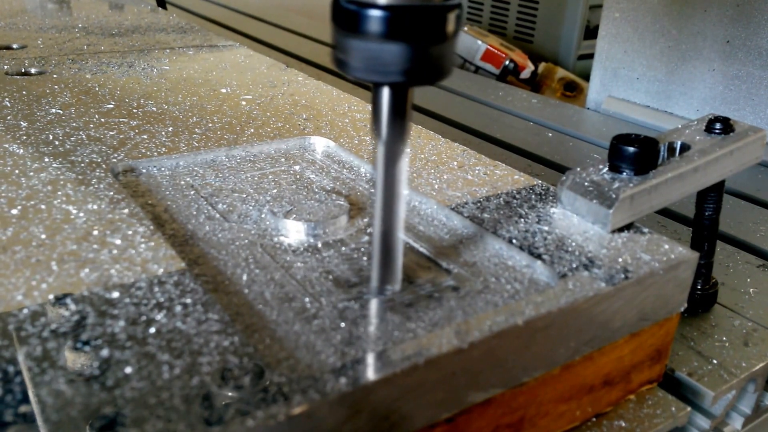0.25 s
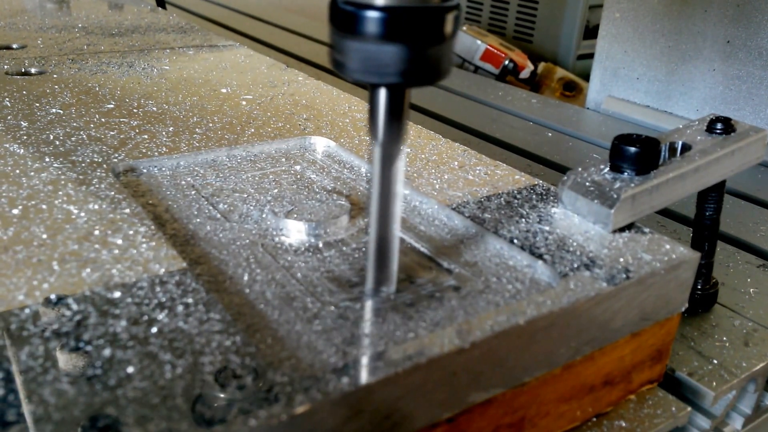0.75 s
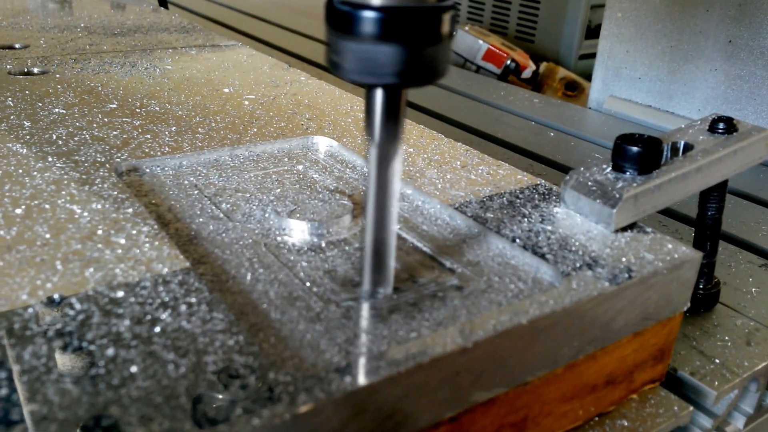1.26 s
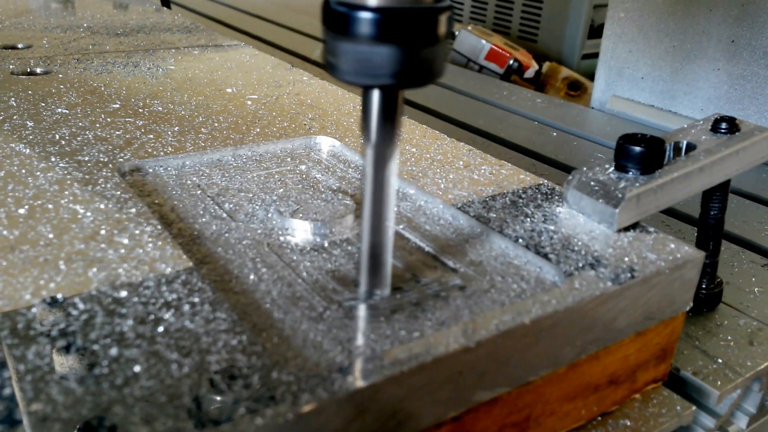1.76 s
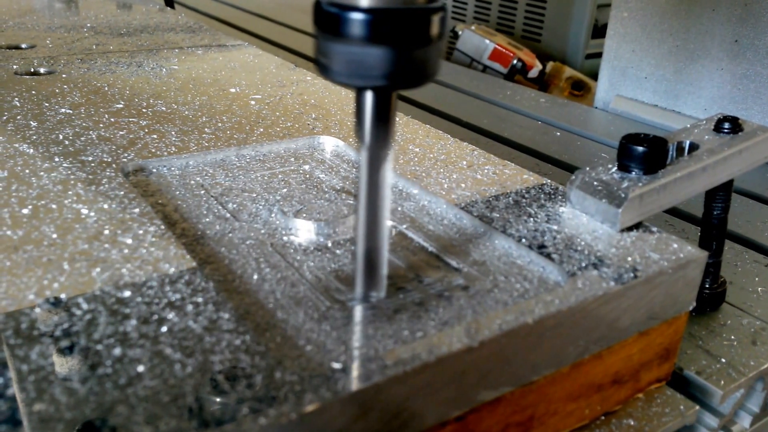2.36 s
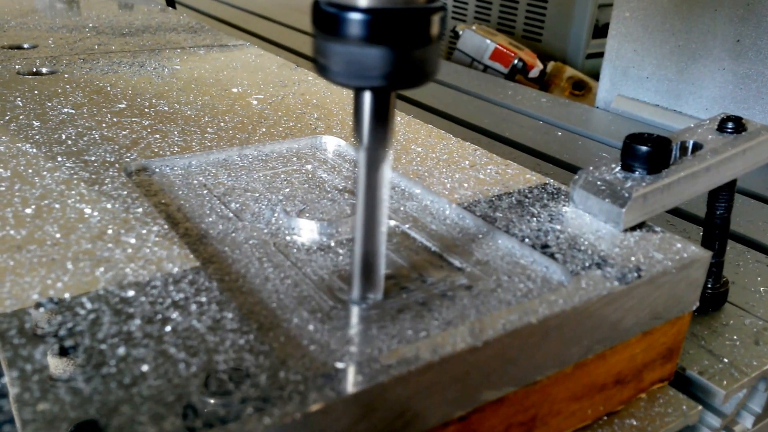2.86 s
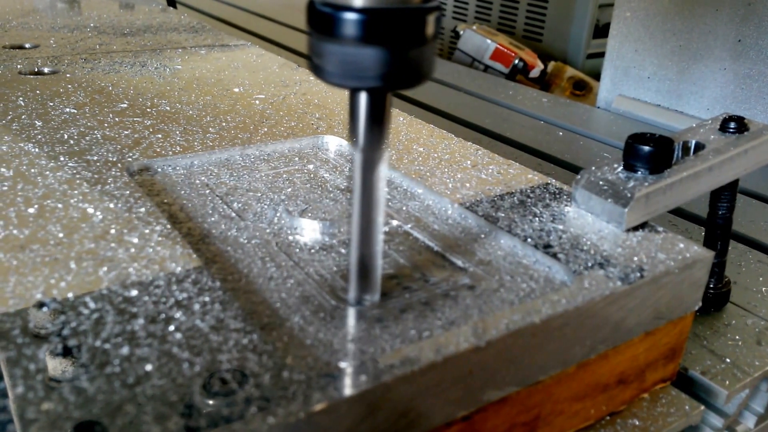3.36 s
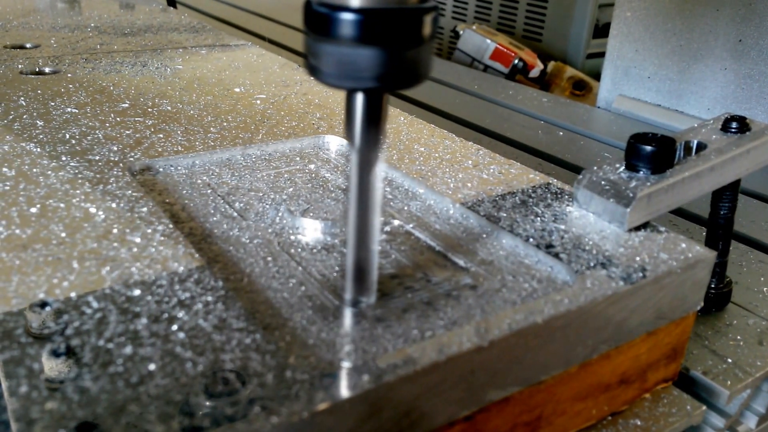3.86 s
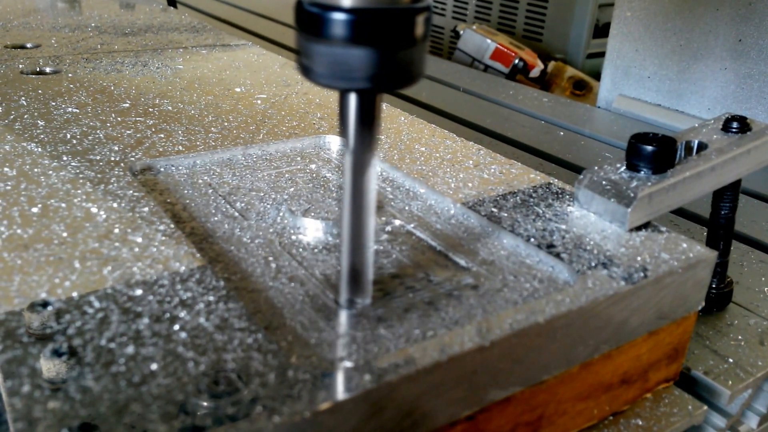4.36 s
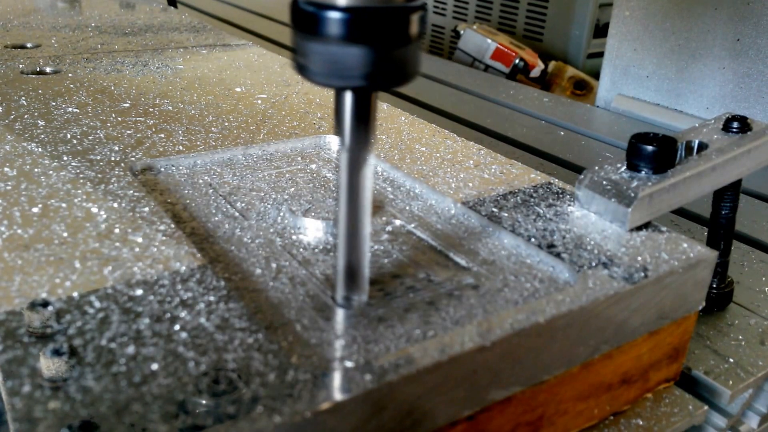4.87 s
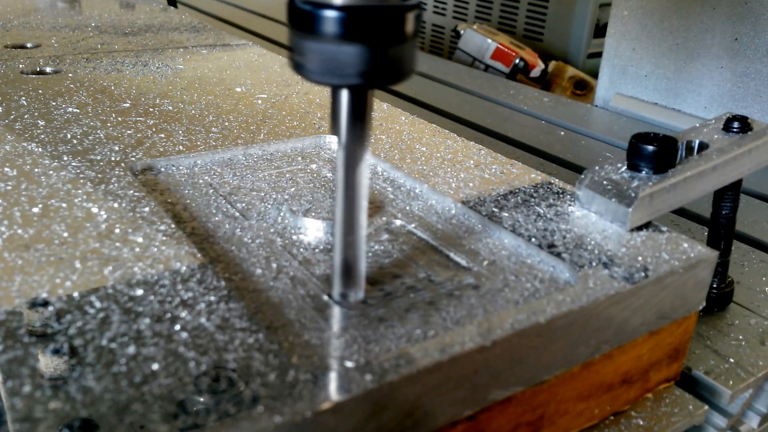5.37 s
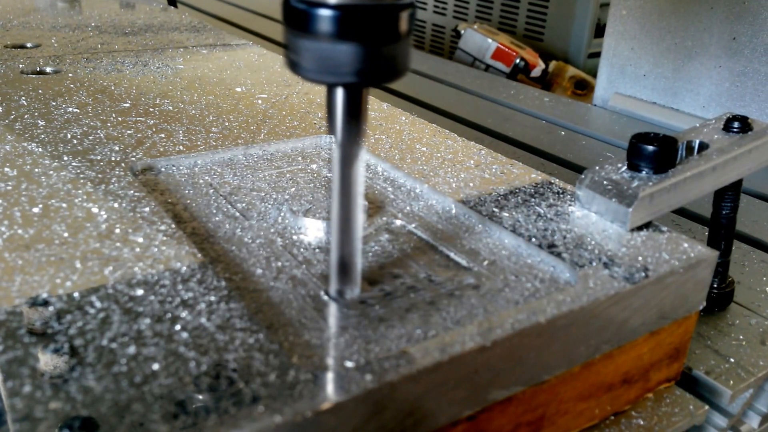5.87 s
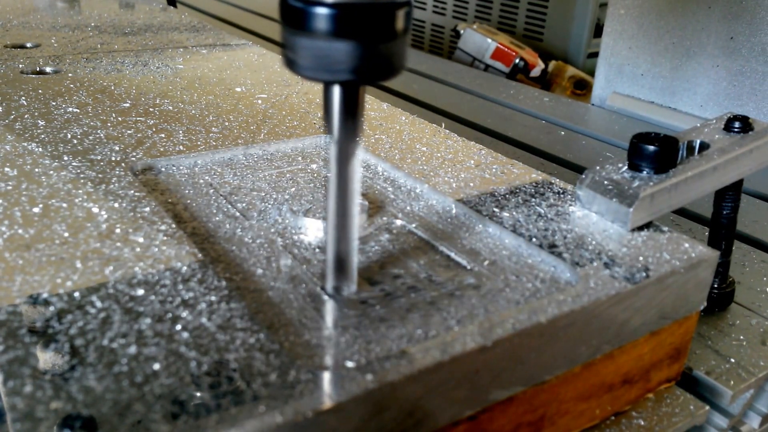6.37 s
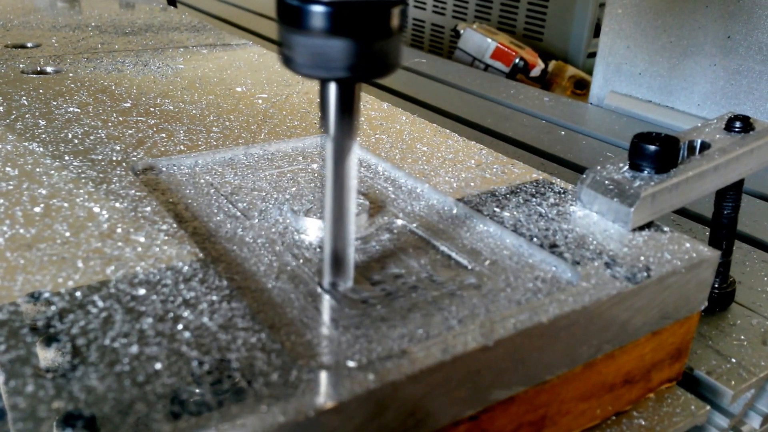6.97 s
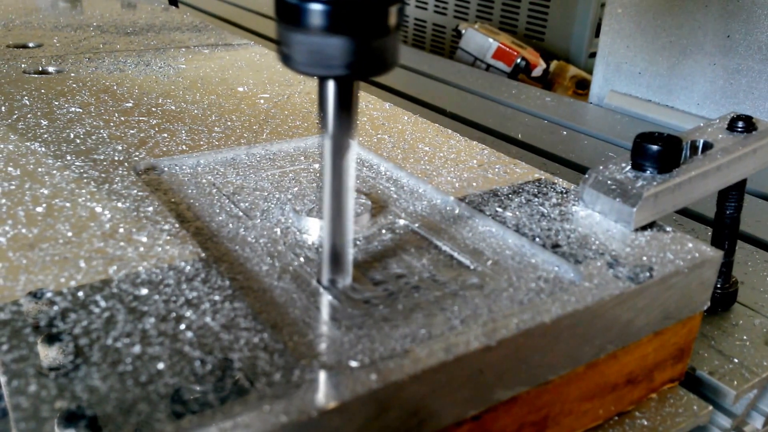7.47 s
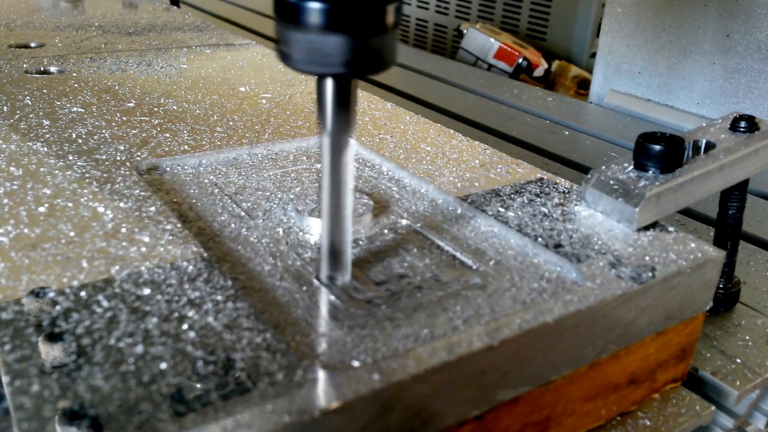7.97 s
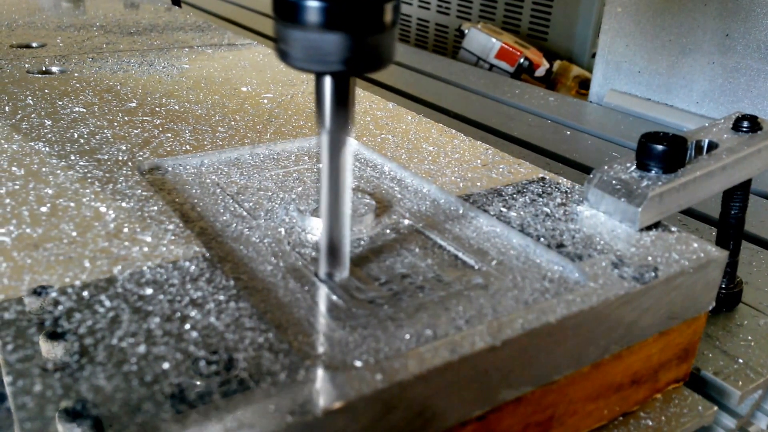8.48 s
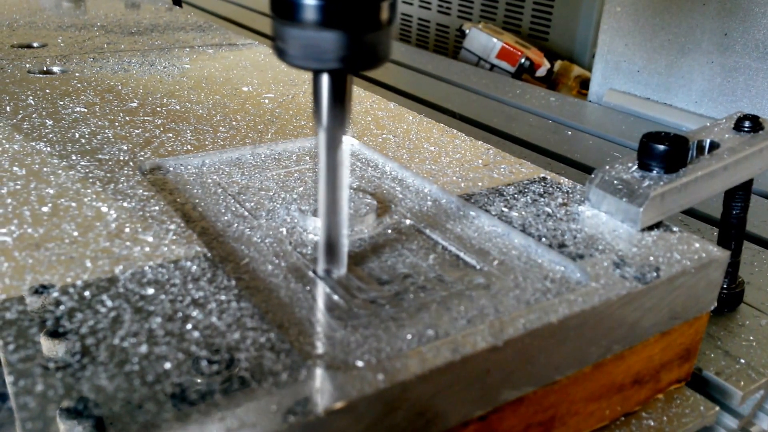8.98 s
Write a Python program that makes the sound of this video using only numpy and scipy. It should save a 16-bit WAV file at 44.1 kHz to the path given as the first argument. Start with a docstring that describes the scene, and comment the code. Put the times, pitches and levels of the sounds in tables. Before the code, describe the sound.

In a workshop, a high-speed router mills a metal plate close to the microphone. A dense, bright whine over a mid-low hum wavers slowly, with hissing chips and metallic ringing. Ragged high chatter comes in bouts, tightens into a clear squeal near four seconds, and stops abruptly at the corner. Smoother whining and hissing continue to the end. The right side is bright, the left dull.

```python
"""In a workshop, a CNC router mills a pocket in an aluminium plate with a two-flute cutter at about 24000 rpm.
The induction rotor slips behind its drive, so paired sines make each order of the whine beat; fixed sines
give the hum of the machine, its bearings and the whistle of the inverter. Gliding sines with sidebands chatter,
then lock into a squeal that ends at the corner of the pocket. Shaped noise gives hissing chips, a ringing plate
and rumble; short enveloped sines knock in the frame. The left microphone port is muffled."""
import sys
import numpy as np
from scipy import signal
from scipy.fft import rfft, irfft
from scipy.io import wavfile

SR = 44100
rng = np.random.default_rng(int(sys.argv[2]) if len(sys.argv) > 2 else 0)


def output_pcm(signal):
    """Save a mono or channel-first signal as 16-bit PCM at the path in sys.argv[1].

    Samples are clipped to [-1, 1] before scaling.
    """
    pcm = np.clip(np.atleast_2d(signal).T, -1, 1) * 32767
    wavfile.write(sys.argv[1], SR, np.round(pcm).astype(np.int16))


N = 407484
TIME = np.arange(N) / SR
FREQS = np.fft.rfftfreq(N, 1 / SR)

DRIVE_HZ = 399.905  # turns per second of the drive field
IN_STEP_S = 7.64  # rotor and drive line up at this moment
CUTTER_HZ = 4500  # the cutter's own mode
SQUEAL_S = 3.97  # the chatter locks here and holds until the corner
CORNER_S = 4.535  # the cutter turns onto the second side
CHATTER_EDGE_S = 0.047  # length of the ramp at either end of a bout of chatter

# how hard the cutter is loaded, before each layer takes its share: (time [s], load [dB])
DEPTH = [(0, 2.6), (1.2, 0), (3.4, -0.4), (4.6, -1.6), (5.3, -0.8), (6.1, 1), (9.24, 1.5)]


def undb(db):
    """Decibels to gain."""
    return 10 ** (np.asarray(db) / 20)


def curves(table):
    """Each column of a table of moments, joined by straight lines."""
    s, *columns = np.transpose(table)
    return [np.interp(TIME, s, column) for column in columns]


def spectra(table):
    """Each column of a table of frequencies, joined on a log axis."""
    hz, *columns = np.transpose(table)
    return [np.interp(np.log(FREQS + 1), np.log(hz), column) for column in columns]


def walk(rate):
    """Random control curve with a spread near 1 and this many new values a second."""
    knots = rng.standard_normal(8192)
    return 1.2 * np.interp(TIME * rate, np.arange(len(knots)), knots)


def noise(gain):
    """Noise with the given amplitude per root Hz."""
    return irfft(rfft(rng.standard_normal(N)) * gain, N) * np.sqrt(SR / 2)


def tone(cycles, db):
    """A sine of the given rms level."""
    return np.sqrt(2) * undb(db) * np.sin(2 * np.pi * cycles)


def step(s, length_s):
    """A ramp from 0 to 1 centred on a moment."""
    return np.clip((TIME - s) / length_s + .5, 0, 1)


def squeal_grip():
    """How far the squeal has taken over from clean cutting, 0-1: it builds, then lets go at the corner."""
    build_s, release_s = 0.49, 0.025
    return np.clip((TIME - SQUEAL_S) / build_s, 0, 1) * (1 - step(CORNER_S, release_s))


def rotor_lag():
    """Turns by which the rotor has fallen behind its drive; every beat in the whine follows this."""
    first_hz, second_hz, squeal_extra_hz = .39, .407, .16
    first_side_hz = first_hz + squeal_extra_hz * (TIME > SQUEAL_S)
    slip_hz = np.where(TIME < CORNER_S, first_side_hz, second_hz)
    lag = np.cumsum(slip_hz) / SR
    return lag - np.interp(IN_STEP_S, TIME, lag)


def low_tones(turns, lag):
    """The once-a-turn hum, and the flute tone, which swells twice for each turn that the rotor loses."""
    # once-a-turn hum before its gain and flicker: (time [s], level [dB])
    hum_levels = [(0.0, -34), (0.67, -47), (1.44, -36), (2.57, -44.5), (3.29, -43.5), (3.94, -39),
                  (4.42, -51), (4.58, -44.5), (5.51, -48), (6.25, -42.5), (8.05, -43), (8.26, -40),
                  (9.24, -42.5)]
    # flute tone under its beat and flicker: (time [s], level [dB])
    flute_levels = [(0, -23), (1.4, -29), (2.7, -26.5), (3.4, -28.5), (5.3, -28), (9.24, -25)]
    hum_gain_db, hum_flicker_db = 4, 1.06
    beat_db, beat_lead_turns, flute_flicker_db = 3, 0.057, 0.95
    hum_db = curves(hum_levels)[0] + hum_gain_db + hum_flicker_db * walk(20)
    beat = beat_db * np.cos(4 * np.pi * (lag + beat_lead_turns))
    flute_db = curves(flute_levels)[0] + beat + flute_flicker_db * walk(30)
    return tone(turns, hum_db) + tone(2 * turns, flute_db)


def spindle(turns):
    """Orders of the rotor, each beating against the same order of the drive."""
    # one row per order of the turn, from the third up; levels before load, squeal, flicker and swells:
    # (level on the first side [dB], level on the second side [dB], drive over rotor [dB])
    order_levels = [(-39.5, -49, -26), (-33.5, -43.5, -33), (-60.5, -44.5, -30), (-45, -42.5, -21),
                    (-49.5, -49, -10), (-35.5, -33.5, -32), (-49, -56, -6), (-32, -34.5, -10.5),
                    (-30, -28, 5.5), (-34.5, -32.5, -9.5), (-30, -28, 2.5), (-33, -36.5, -5),
                    (-42.5, -48, 1), (-40, -37.5, 7), (-35.5, -37, 10.5), (-40.5, -34.5, -18),
                    (-28, -32, -7.5), (-29.5, -29.5, 4.5), (-33, -26, 9), (-26, -26.5, -8), (-32, -28.5, 6),
                    (-28.5, -31, 2), (-39, -30, 5), (-36, -44, -8), (-33, -31.5, 16), (-36, -35, -2),
                    (-40, -45, -1), (-31.5, -33, -10), (-36, -34, 19), (-40, -43, -1), (-35, -43, 16),
                    (-44, -45, -7), (-44, -44, 12), (-43, -39.5, -5)]
    # single orders swell or fade as the cutter travels over the plate:
    # (order [-], centre time [s], time from the centre to 1/e of the change [s], change [dB])
    swells = [(3, 0.12, 0.5, 3.5), (3, 8.46, 1, 6), (7, 1.31, 0.22, 11), (8, 1.32, .22, -11),
              (10, 1.43, 0.23, 8.5), (11, 1.32, 0.12, 8.5), (18, 1.35, 0.23, 7), (8, 3.98, 0.13, 7.5),
              (8, 4.17, 0.1, -7)]
    depth_share, squeal_db = 0.58, -7
    flicker_db, sway_db = 1.54, 1.13  # fast and slow level changes
    twist_turns = 0.0016
    skew_turns = 0.0897  # each higher order beats a little later
    nearest_order = round(CUTTER_HZ / DRIVE_HZ)
    drive = DRIVE_HZ * (TIME - IN_STEP_S)
    strength_db = depth_share * curves(DEPTH)[0] + squeal_db * squeal_grip()
    shaken = turns + twist_turns * walk(120)  # each bite twists the cutter a little
    whine = 0
    for order, (first_db, second_db, drive_db) in enumerate(order_levels, start=3):
        # low orders come from the gantry and change with its position; high ones change with the cut
        blend_s = 1.42 if order < 8 else .02
        db = first_db + step(CORNER_S, blend_s) * (second_db - first_db) + strength_db
        db = db + flicker_db * walk(35) + sway_db * walk(1.995)
        for swell_order, s, spread_s, swell_db in swells:
            if round(swell_order) == order:
                db = db + swell_db * np.exp(-((TIME - s) / spread_s) ** 2)
        # short waves travel by different paths, so the high orders beat out of step
        start = rng.random()
        path = rng.standard_normal() * np.clip((order - 13) / 20, 0, 1)
        path = path - skew_turns * (order - nearest_order)
        rotor_tone = tone(order * shaken + start, 0)
        drive_tone = tone(order * drive + start + path, drive_db)
        # the level is that of both tones together
        whine = whine + undb(db) * (rotor_tone + drive_tone) / np.hypot(1, undb(drive_db))
    return whine


def steady_tones():
    """Machine hum, bearing tones and the switching whistle of the inverter: fixed sines that flicker."""
    # pitches of machine, bearings and inverter: (frequency [Hz])
    tone_hz = [137.7, 437.4, 543.7, 3360, 4161, 6555, 7353, 8155, 8957, 9286, 9356, 9415, 10029, 10153,
               10212, 10938, 11353, 11401, 12203, 12945, 14220]
    # their levels before the flicker, in the same order: (level [dB])
    tone_db = [-65.5, -42.5, -50, -50.5, -40, -47, -39, -36, -53, -40, -41.5, -29, -37, -46, -33, -57, -42,
               -34, -47, -42, -41]
    flicker_db = 2.5
    return sum(tone(hz * TIME + rng.random(), db + flicker_db * walk(12)) for hz, db in zip(tone_hz, tone_db))


def chatter_bouts():
    """Gate, level, pitch and unsteadiness of the chatter, gliding through all its bouts."""
    # each bout glides from its first values to its last; pitch is above the cutter's mode:
    # (start [s], end [s], first level [dB], last level [dB], first pitch [Hz], last pitch [Hz],
    #  first unsteadiness [0-1], last unsteadiness [0-1])
    bouts = [(-.1, 0.37, -26, -27, 80, 35, 0.8, 0.57), (0.503, 1.162, -25.5, -22, 35, 84.5, 0.6, 0.55),
             (1.58, 2.534, -23, -24, 72, 47.5, 0.63, 0.69), (2.58, 3.223, -30, -25, 44, 36.5, .85, 0.51),
             (3.25, 3.945, -22, -20.3, 62, 35.5, .6, 0.07), (3.956, 4.538, -20, -19.5, 14.3, -3, 0, 0.09)]
    gate = sum(step(start, CHATTER_EDGE_S) - step(end, CHATTER_EDGE_S) for start, end, *_ in bouts)
    # pair first and last values, then string the bouts into one line per quantity
    pairs = np.reshape(bouts, (len(bouts), -1, 2))
    s, db, above_hz, unsteady = (pairs[:, k].ravel() for k in range(pairs.shape[1]))
    return gate, np.interp(TIME, s, db), np.interp(TIME, s, CUTTER_HZ + above_hz), np.interp(TIME, s, unsteady)


def chatter(turns, lag):
    """The cutter vibrates on its own mode, ragged and pumped by a beat, until it locks into the waves it has cut."""
    # the turning flutes chop the chatter; levels are relative to the bout:
    # (multiple of the chatter [-], offset [orders], level when ragged [dB], level when locked [dB])
    sidebands = [(1, -6, -49, -30.5), (1, -4, -3.5, -16), (1, -2, -9, -19), (1, -1, -31, -30),
                 (1, 0, -3.5, 2.5), (1, 1, -21, -12), (1, 2, -6.5, 0), (1, 3, -16, -28), (1, 4, -10, -15.5),
                 (1, 6, -14, -19), (1, 7, -29, -29), (1, 8, -7, -13), (1, 9, -27, -27), (1, 10, -4.5, -6.5),
                 (2, -4, -11.5, -22), (2, -2, -28, -28), (2, 0, -27, -13), (2, 2, -26, -15),
                 (2, 4, -28, -33)]
    # a low sideband of the squeal sets the plate singing: (time [s], level [dB])
    plate_song = [(3.85, -41), (4.02, -24), (4.15, -23.5), (4.29, -14.5), (4.38, -20.5), (4.48, -21.5),
                  (4.55, -28), (4.63, -53)]
    wander_hz, idle_rise_hz = 19, 55
    flutter_db, sag_db, pump_db = 3.5, -1, 0.5  # all grow with unsteadiness
    residue_db = -44  # a faint ragged trace between bouts
    gate, db, hz, unsteady = chatter_bouts()
    unsteady = gate * unsteady + 1 - gate
    pitch_hz = hz + (1 - gate) * idle_rise_hz + wander_hz * unsteady * walk(110)
    cycles = np.cumsum(pitch_hz) / SR
    squeal = 0
    for multiple, offset, ragged_db, locked_db in sidebands:
        sideband_db = locked_db + unsteady * (ragged_db - locked_db)
        squeal = squeal + tone(round(multiple) * cycles + round(offset) * turns + rng.random(), sideband_db)
    # the order nearest to the cutter's mode pumps the level with its beat
    pump = pump_db * np.cos(2 * np.pi * round(CUTTER_HZ / DRIVE_HZ) * lag)
    ragged_change_db = unsteady * (sag_db + pump + flutter_db * walk(45))
    size = (gate * undb(db) + (1 - gate) * undb(residue_db)) * undb(ragged_change_db)
    song = tone(cycles - 8 * turns, curves(plate_song)[0])
    return squeal * size + song


def resonance(hz, width, db):
    """Amplitude per root Hz of one noise-driven resonance; width is from its centre to half amplitude."""
    return undb(db) / np.sqrt(np.pi * width / 2) / (1 + ((FREQS - hz) / width) ** 2)


def fine_modes():
    """Countless narrow resonances of plate and gantry ripple the spectrum of the noise, less in the bass."""
    hz = np.arange(0, SR / 2, 32)
    ripple_db = 3.8 * np.interp(FREQS, hz, rng.standard_normal(len(hz)))
    return undb(ripple_db * np.clip(FREQS / 2500, .3, 1))


def cutting_noise(turns, ripple):
    """Chips tear off once a flute, one flute deeper than the other; plate and frame ring with the cut."""
    # hiss of the chips before the cut sets its level: (frequency [Hz], level [dB per Hz])
    chip_colour = [(400, -127), (850, -68), (1200, -70), (2000, -74), (2650, -80.5), (3150, -72),
                   (3550, -75.5), (4300, -64), (5400, -79.5), (5850, -79), (6100, -66.5), (6680, -80),
                   (7050, -62.5), (7500, -63.5), (9300, -63.5), (11400, -62.5), (11900, -64.5),
                   (12300, -65.5), (13450, -69.5), (14500, -73.5)]
    # resonances of the plate before the cut sets their level: (frequency [Hz], half width [Hz], level [dB])
    plate_modes = [(1341.5, 30, -37.5), (2400, 140, -48), (2936, 28, -42), (3767, 43, -42.5),
                   (4100, 78, -55), (4626, 70, -38), (4920, 120, -42), (5364, 70, -37)]
    # rumble of the frame before the cut sets its level: (frequency [Hz], level [dB per Hz])
    frame_colour = [(25, -112), (70, -100), (130, -88), (165, -83), (200, -73.5), (225, -83.5),
                    (260, -65.5), (300, -71.5), (345, -80), (480, -64), (620, -67.5), (720, -73),
                    (960, -79), (1100, -85), (1500, -105)]
    # the gantry drones along the second side, before the cut sets its level:
    # (frequency [Hz], half width [Hz], level [dB])
    gantry_mode = (246, 28, -52.5)
    # the cut runs smooth between two bouts of chatter, and the plate rings less: (start [s], end [s])
    lull_s = (1.26, 1.45)
    bite, runout = 0.12, 0.19  # depth of the pulse per flute and per turn
    hiss_second_db, hiss_depth, hiss_squeal_db, hiss_lull_db = -3, 1.7, 2, -1
    drum_base_db, drum_depth, drum_squeal_db, plate_lull_db = 0.52, 0.58, -7, -8
    chip_flicker_db, frame_flicker_db, frame_share = 1.9, 2, 0.87
    split_hz = 6800

    depth, grip, second = curves(DEPTH)[0], squeal_grip(), step(CORNER_S, CHATTER_EDGE_S)
    lull = step(lull_s[0], CHATTER_EDGE_S) - step(lull_s[1], CHATTER_EDGE_S)
    hiss_db = second * hiss_second_db + hiss_depth * depth + hiss_squeal_db * grip + hiss_lull_db * lull
    drum_db = drum_base_db + drum_depth * depth + drum_squeal_db * grip

    # the plate radiates the lower part of the tearing, the cutting edge the top
    colour = undb(spectra(chip_colour)[0]) * ripple
    top = 1 / (1 + (split_hz / (FREQS + 1)) ** 8)
    edge_noise = noise(colour * np.sqrt(top)) * undb(hiss_db)
    plate_noise = noise(colour * np.sqrt(1 - top)) * undb(drum_db)
    pulse = 1 + bite * np.cos(4 * np.pi * turns) + runout * np.cos(2 * np.pi * turns)
    pulse = pulse / np.sqrt(np.mean(pulse ** 2))
    chips = (edge_noise + plate_noise) * pulse * undb(chip_flicker_db * walk(40))

    modes = sum(resonance(*mode) for mode in plate_modes)
    ringing = noise(modes * np.sqrt(ripple)) * undb(drum_db + plate_lull_db * lull)
    frame = noise(undb(spectra(frame_colour)[0]) * ripple) + second * noise(resonance(*gantry_mode))
    return chips + ringing + frame * undb(frame_share * drum_db + frame_flicker_db * walk(14))


def rumble():
    """Faint, uneven low noise, drawn afresh for each port."""
    # rumble before its gusts: (frequency [Hz], level [dB per Hz])
    rumble_colour = [(25, -103), (70, -90), (110, -82.5), (170, -82.5), (260, -89), (600, -140)]
    gust_db = 3
    return noise(undb(spectra(rumble_colour)[0])) * undb(gust_db * walk(16))


def knocks():
    """Soft thuds of the frame: a few cycles of a low sine under a bell-shaped envelope."""
    # dull knocks before their common gain: (time [s], level [dB], frequency [Hz])
    thuds = [(.113, -48, 135.5), (.21, -56, 130.6), (.554, -51, 125), (.8, -62, 128.5), (1.419, -51, 95),
             (2.432, -51, 130), (2.75, -54, 139), (3.681, -55, 125), (3.882, -50, 135.3),
             (5.17, -55, 123.8), (5.93, -52, 130), (6.164, -51, 130), (6.92, -54, 105.7), (8.532, -49, 139),
             (8.96, -51, 66)]
    spread_s, gain_db = 0.023, 4.5
    out = 0
    for s, db, hz in thuds:
        envelope = np.exp(-np.minimum(((TIME - s) / spread_s) ** 2, 20))
        out = out + tone(hz * TIME + rng.random(), db + gain_db) * envelope
    return out


def scene():
    """The machine at the right port; the left hears it dull and phase-shifted, with other reflections of the noise."""
    # the left port against the right: (frequency [Hz], level [dB], phase [rad])
    left_port = [(40, -2, 2.5), (134, -3, 1.6), (260, -5, 1.06), (400, -6, -.7), (800, -7, -2.1),
                 (1020, -14, -3), (1200, -3, -1.2), (1310, -2, -2.8), (1600, -5, -3.6), (2000, 2, -5.7),
                 (2400, -6, -4.2), (2930, -8, -4.9), (3200, -20, -5.9), (3600, -1, -5), (3720, -5, -7.8),
                 (4000, -5, -9.9), (4400, -7, -10.5), (4510, -9, -11), (4560, -16, -9.5), (4800, -17, -8.4),
                 (5200, -7, -8.8), (5310, -19, -9.2), (5600, -19, -10.3), (6650, -40, -15.5),
                 (10800, -37.5, -7), (14400, -24, -13)]
    diffuse = 0.3  # share of the left noise power that is independent of the right
    lag = rotor_lag()
    turns = DRIVE_HZ * (TIME - IN_STEP_S) - lag
    tones = low_tones(turns, lag) + spindle(turns) + steady_tones() + chatter(turns, lag) + knocks()
    direct = cutting_noise(turns, fine_modes())
    reflected = cutting_noise(turns, fine_modes())
    left = tones + np.sqrt(1 - diffuse) * direct + np.sqrt(diffuse) * reflected
    port_db, port_phase = spectra(left_port)
    left = irfft(rfft(left) * undb(port_db) * np.exp(1j * port_phase), N)
    return np.array([left + rumble(), tones + direct + rumble()])


def record(dry):
    """A steep elliptic low-pass cuts the top."""
    top_hz = 14550
    return signal.sosfilt(signal.ellip(12, .2, 80, top_hz, fs=SR, output="sos"), dry)


dry = scene()
out = record(dry)
output_pcm(out)
```